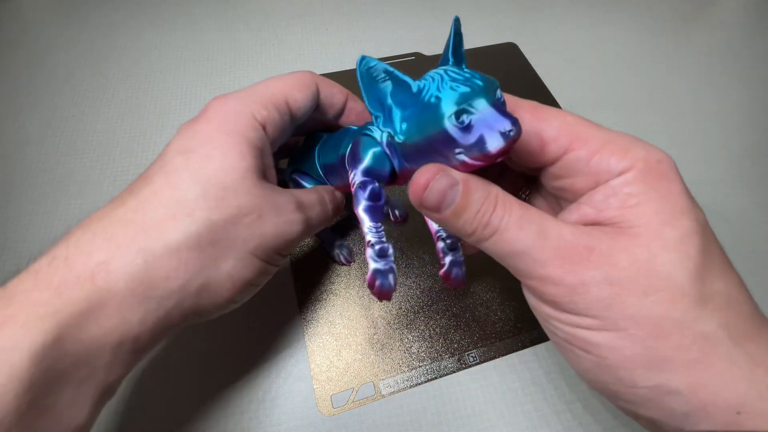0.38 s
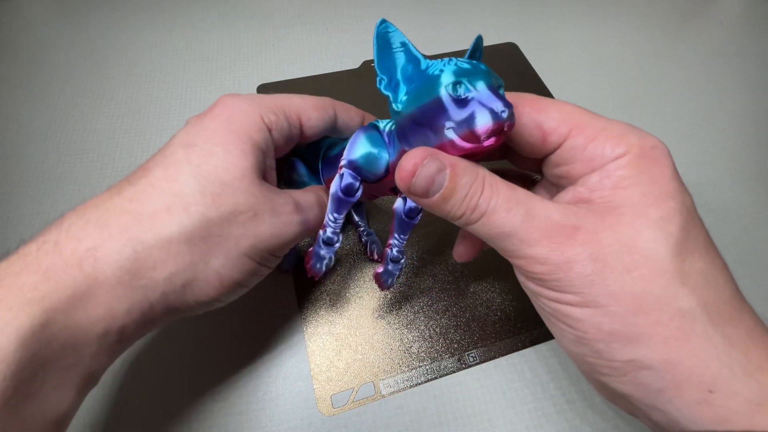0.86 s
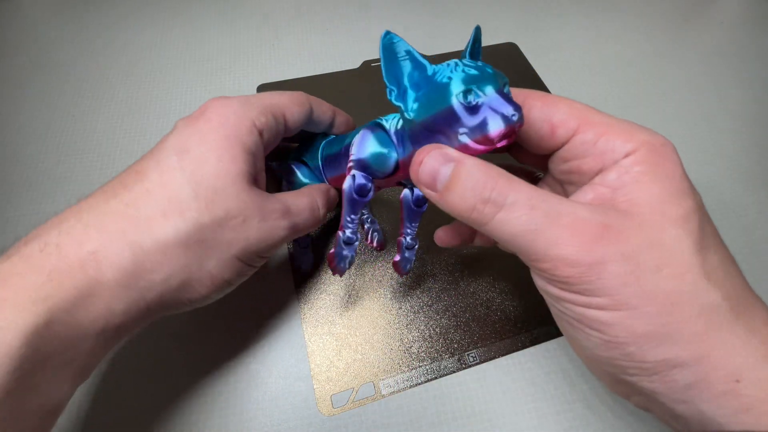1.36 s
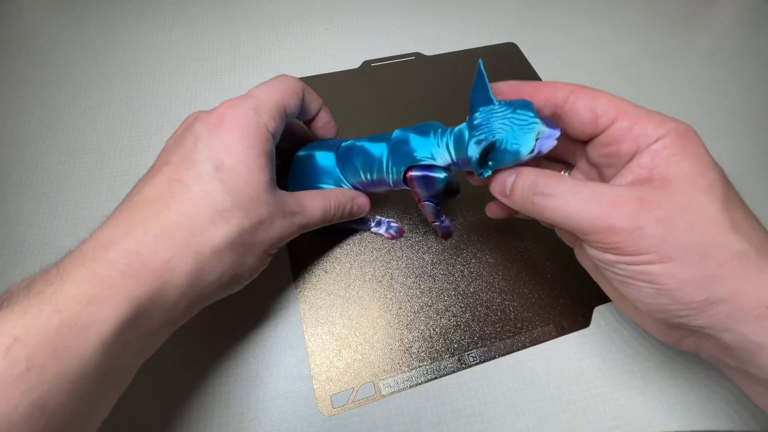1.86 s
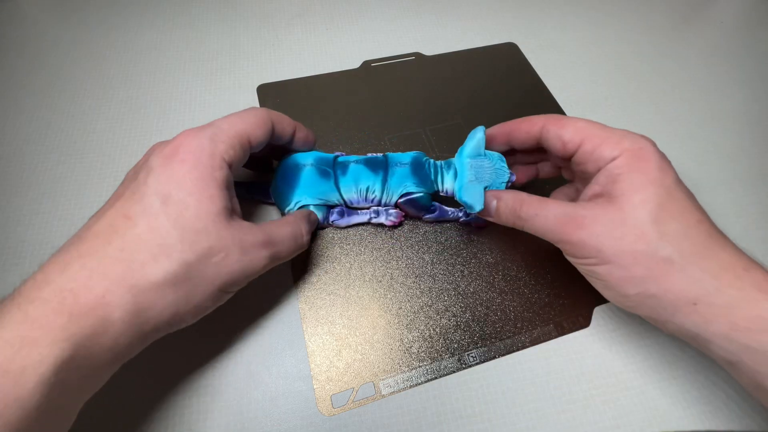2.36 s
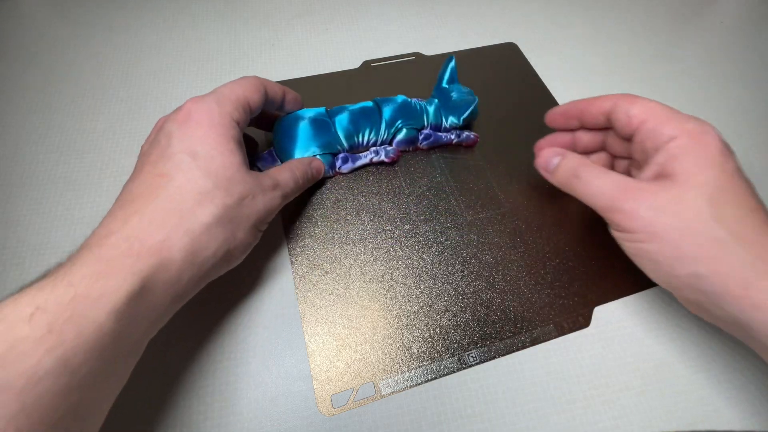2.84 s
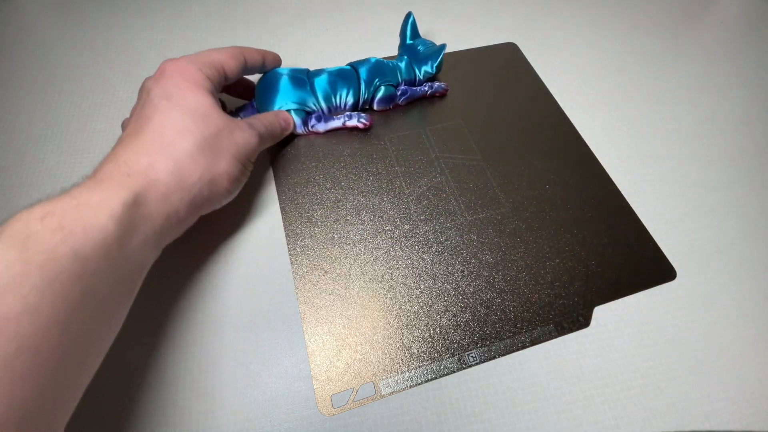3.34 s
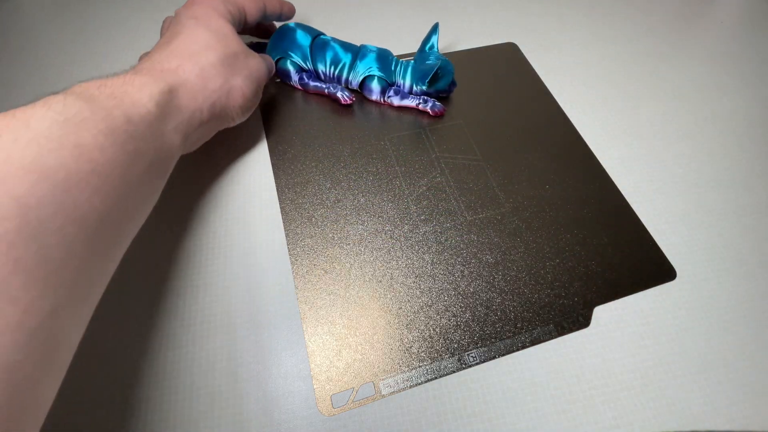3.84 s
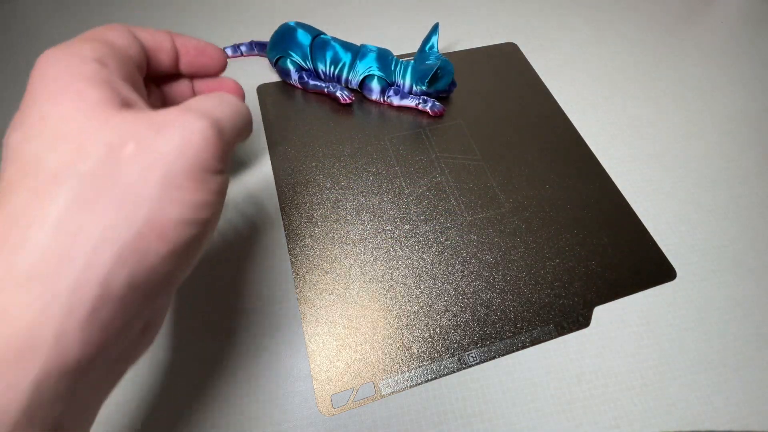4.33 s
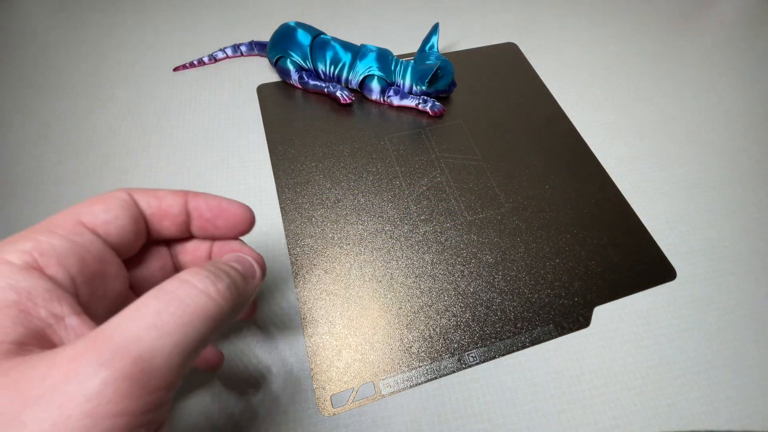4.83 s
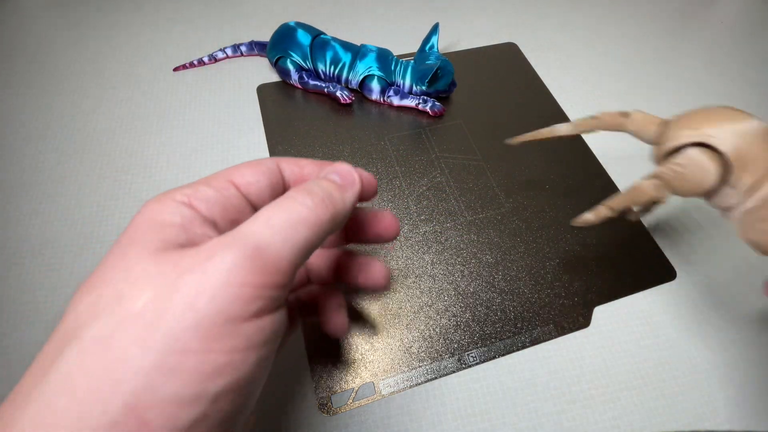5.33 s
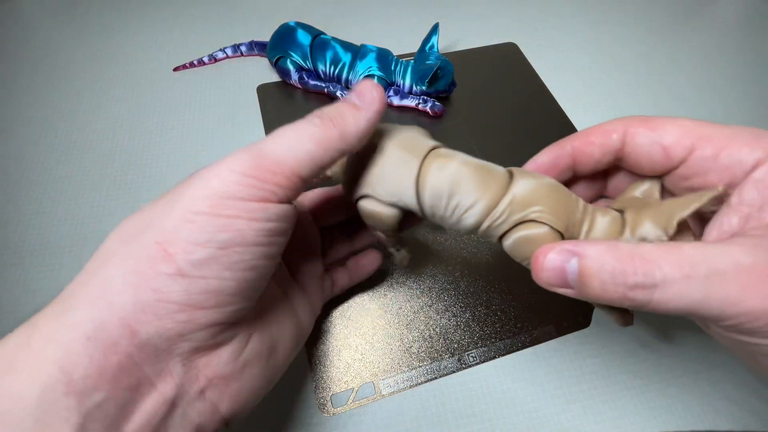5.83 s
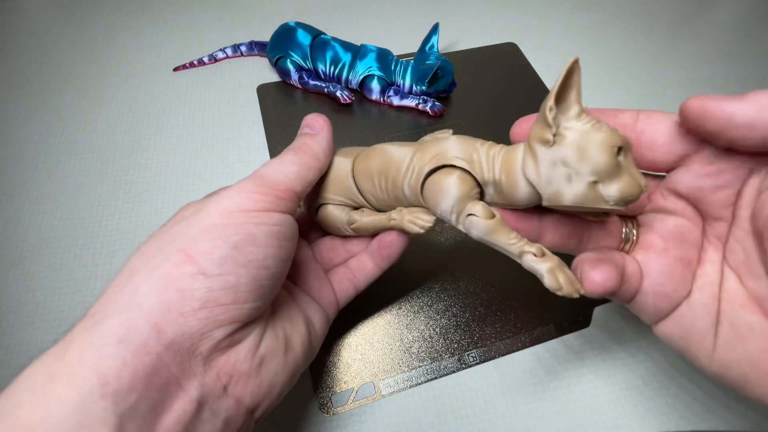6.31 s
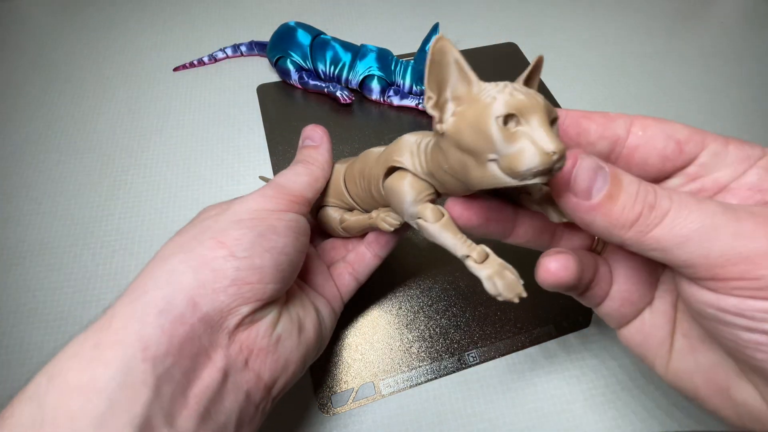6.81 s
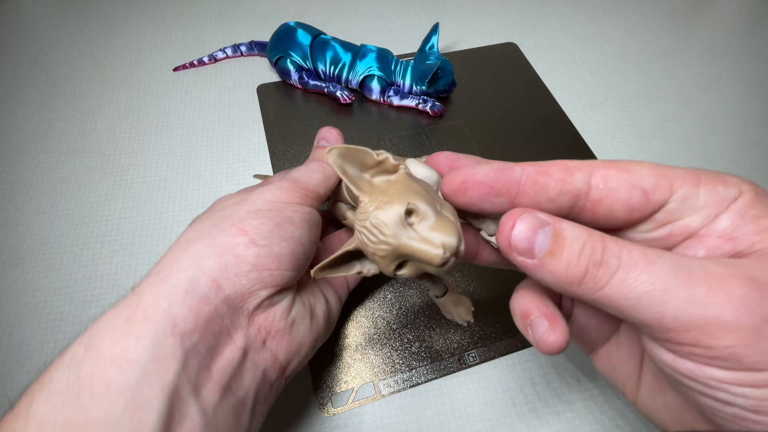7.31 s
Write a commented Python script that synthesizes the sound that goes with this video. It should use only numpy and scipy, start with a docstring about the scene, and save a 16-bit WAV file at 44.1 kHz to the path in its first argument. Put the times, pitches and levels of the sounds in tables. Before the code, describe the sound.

Hands flex a hollow jointed plastic figure close to a phone, with faint rubbing and small clicks. Clacks quicken into one loud knock on a metal sheet over a table, followed by gritty scraping as it slides. After a near-quiet gap, a second figure drags briefly over the table with bright ticks, then clicks and creaks softly in the hands. Small dry room, faint low hum.

```python
"""A table in a small room: hands flex two jointed plastic figures close to a phone, knock one down on a
textured metal sheet and slide it, then drag the second over the table. Knocks are short contact rattles
that excite decaying modes of the hollow plastic and the table top; rubbing is stick-slip noise through
resonances. Two microphone ports add phase, balance and reflections; a faint motor hum and air noise lie below."""
import sys
import numpy as np
from scipy import signal
from scipy.fft import rfft, irfft
from scipy.io import wavfile
from scipy.ndimage import uniform_filter1d

SR = 44100
rng = np.random.default_rng(int(sys.argv[2]) if len(sys.argv) > 2 else 0)


def digitize_waveform(pressure):
    """Quantize a signal to 16-bit integers and store it at the path in sys.argv[1].

    Rows of a 2-D input are taken as channels; values are limited to [-1, 1].
    """
    field = np.atleast_2d(pressure).T
    bounded = np.clip(field, -1, 1)
    quanta = np.round(bounded * 32767).astype(np.int16)
    wavfile.write(sys.argv[1], SR, quanta)


def magnitude_from_level(level_db):
    """Linear magnitude for a level in decibels (20 dB per decade)."""
    exponent = np.asarray(level_db, float) / 20
    return 10 ** exponent


N = 327663
T = np.arange(N) / SR
HZ = np.fft.rfftfreq(N, 1 / SR)
# modes of the table top, lowest first: f/Hz, level/dB, decay time T60/s
TABLE_MODES = [(78, -12, 0.4), (108.2, -3, 0.48), (339.2, -3.5, 0.14), (521.4, -13.5, 0.092)]
# treble resonances of rubbed plastic: f/Hz, width/Hz, level/dB
HISS_PEAKS = [(8900, 1600, -4.5), (10000, 900, -7.5), (11040, 920, -4.5)]


def knocks():
    """Impact excitation: a rattle of contacts rings the struck part, and the body modes near its pitch."""
    # blows: t/s, level/dB, struck part f/Hz, treble level/dB against the body, rattle length/s
    blows = [(0.2488, -30.5, 3200, -33, 0.0053), (.576, -33, 4900, -9, 0.0039),
             (0.61, -47, 1440, -30, .004), (0.617, -29, 1840, -11, 0.0053),
             (0.728, -38.5, 2100, -19, 0.0034), (.737, -39.5, 4270, -4.5, .003),
             (1.257, -43.5, 1830, -22, 0.0063), (1.623, -29, 3200, -37, 0.0035),
             (1.848, -32, 2600, -21.5, 0.0017), (1.8625, -27.5, 2520, -15, 0.0045),
             (1.9738, -23, 3470, -13, 0.0066), (2.069, -26.5, 3200, -9, 0.004),
             (2.1651, -22.5, 3300, -15.5, 0.003), (2.175, -18, 2320, -23, 0.0024),
             (2.183, -21, 2500, -16, 0.0037), (2.1917, -4, 1947, -14, 0.0044),
             (2.3646, -23.5, 3470, -3, 0.0014), (2.3726, -21.5, 3380, -4, 0.0037),
             (2.3847, -17, 3284, -3, 0.0021), (2.5907, -27.5, 3880, -14.5, 0.0078),
             (3.196, -24.5, 5930, -7.5, 0.0052), (3.255, -26.5, 1590, -9.5, .004),
             (3.4862, -27, 3000, -12, 0.003), (4.399, -38.5, 1210, -24.5, 0.0036),
             (4.433, -31.5, 2150, -49, 0.0041), (4.492, -33, 1240, -42, 0.003),
             (4.512, -30, 980, -40, 0.0029), (4.9802, -22.5, 5500, -2.5, 0.0062),
             (5.0076, -29, 6100, 0, 0.003), (5.028, -26, 5700, -1, 0.0092),
             (5.251, -38, 3630, -8.5, 0.0074), (5.2725, -35.5, 3550, -14, 0.006),
             (5.383, -55, 2500, -23, 0.0046), (5.424, -45, 5800, -7, 0.0082),
             (5.543, -25.5, 4980, -3.5, 0.003), (5.6051, -27, 4500, -3, 0.0023),
             (5.6405, -36, 5370, -14.5, 0.0052), (5.7592, -37.5, 3700, -7.5, 0.0048),
             (5.8204, -33, 5370, -8.5, 0.0065), (5.849, -30, 4780, -11.5, 0.0093),
             (5.9307, -33.5, 3470, -5, 0.004), (5.971, -39.5, 2700, -10, 0.012),
             (6.0391, -41.5, 4230, 4.5, 0.0076), (6.049, -41.5, 3540, -0.5, 0.0092),
             (6.1639, -44.5, 1400, -8.5, 0.0033), (6.299, -36, 4700, 0, 0.0058),
             (6.318, -40, 4500, -8, .005), (6.897, -46, 4600, -7.5, 0.0043),
             (6.978, -35.5, 3200, -38, 0.0063), (7.062, -41.5, 2270, -37, 0.0051),
             (7.083, -41, 3000, -31, 0.0092), (7.1349, -35.5, 2130, -10.5, 0.0016),
             (7.1604, -30, 2160, -25, 0.002), (7.363, -48.5, 1247, -49.5, 0.0052)]
    # modes of the hollow plastic: f/Hz, level/dB, decay time T60/s
    plastic_modes = [(785, -18.5, 0.014), (1287, -5, 0.014), (1600, -13, 0.0089), (2010, -5, 0.015),
                     (2520, -4, 0.009), (3380, -4, 0.0037), (4175, 0, 0.0053), (4980, 1, 0.0052),
                     (5600, -3.5, 0.0064), (6550, -6, 0.0073)]
    mode_hz = np.array(plastic_modes)[:, :1]
    out = np.zeros(N + SR)
    t = np.arange(SR // 4) / SR
    rattle_t = t[:2048]
    bass_cut = signal.butter(2, 650, "high", fs=SR, output="sos")  # knocks carry little bass
    middle = signal.butter(3, (1000, 6500), "band", fs=SR, output="sos")
    treble = signal.butter(3, (7500, 15800), "band", fs=SR, output="sos")
    for start_s, level_db, part_hz, treble_db, rattle_s in blows:
        chance = rng.standard_normal(32)
        swell_s = -0.25 * level_db * rattle_s  # lighter blows swell more slowly
        swell = (1.5 - np.exp(-rattle_t / swell_s)) ** 2
        fade = swell * np.exp(-(rattle_t / rattle_s) ** 2)
        contacts = (rng.random(2048) < 0.15) * rng.standard_normal(2048) * fade

        # modes weaken per octave away from the struck part; hard blows wake more of them
        focus_db_per_octave = -7 + 0.36 * level_db
        near = magnitude_from_level(focus_db_per_octave * np.abs(np.log2(mode_hz / part_hz)))
        shell = np.sum(near * ring(plastic_modes, t, chance), 0)
        part_db = -10.5 - 0.33 * level_db  # the part's own ring stands out more in light knocks
        part = ring([(part_hz, part_db, 0.007)], t, np.zeros(1))[0]
        body = signal.fftconvolve(shell + part, contacts)[:len(t)]
        body = signal.sosfilt(bass_cut, body) / np.abs(body).max()

        # the bare crack of the contacts: middle set by its peak, treble by its rms
        span = int(2 * SR * rattle_s)
        crack = signal.sosfilt(middle, contacts)
        body[:2048] += magnitude_from_level(-13.5) * crack / np.max(crack[:span])
        crack = signal.sosfilt(treble, contacts)
        body[:2048] += magnitude_from_level(treble_db) * crack / np.std(crack[:span])

        # the table swings up over a few milliseconds; harder blows pass on a larger share
        table = (1 - np.exp(-t / 0.011)) * np.sum(ring(TABLE_MODES, t, chance), 0)
        body += magnitude_from_level(-17 + level_db) * table
        i = int(start_s * SR)
        out[i:i + len(t)] += magnitude_from_level(level_db) * body
    return out[:N]


def ring(modes, t, chance):
    """Modal decay: damped sines, the most damped shifting most in pitch and weight on every blow."""
    hz, db, t60 = np.transpose(modes)[:, :, None]
    hz = hz + 0.6 / t60 * chance[:len(hz), None]
    db = db + 0.015 / t60 * chance[::-1][:len(hz), None]
    return magnitude_from_level(db) * np.exp(-np.log(1000) * t / t60) * np.sin(2 * np.pi * hz * t)


def pings():
    """Lightly damped resonance: a thin part rings on, fluttering while it still touches its neighbour."""
    # thin parts left ringing by a knock: t/s, level/dB, f/Hz, decay time T60/s
    ringing_parts = [(5.012, -30, 5790, 0.19), (5.034, -44, 5760, 0.46), (5.276, -53, 3550, 0.21)]
    out = np.zeros(N)
    wobble = 1.3 * walk(200)  # radians
    for start_s, db, hz, t60 in ringing_parts:
        t = np.maximum(T - start_s, 0)
        onset = 1 - np.exp(-t / 0.0019)
        out += magnitude_from_level(db - 60 * t / t60) * onset * np.sin(2 * np.pi * hz * t + wobble)
    return out * magnitude_from_level(3 * walk(160))


def sliding():
    """Sliding friction: plastic scrapes over the grainy sheet or the table and makes the top rumble."""
    # a figure pushed over the sheet, then one dragged over the table: t/s, scrape level/dB, table level/dB
    slides = [
        [(2.225, -37, -53), (2.255, -40.5, -47), (2.345, -47, -54.5), (2.395, -35.5, -44.5),
         (2.494, -48.5, -44), (2.689, -40.5, -40), (2.998, -46, -45), (3.497, -46, -46), (3.647, -49.5, -52.5),
         (3.861, -49, -50.5), (4.026, -77, -76.5)],
        [(4.33, -76.5, -72.5), (4.43, -56, -51), (4.47, -63, -46), (4.51, -48.5, -50.5), (4.744, -38, -46.5),
         (4.869, -46.5, -85), (4.939, -69, -68), (5.034, -39, -48), (5.153, -77, -62.5), (5.198, -68, -76)],
    ]
    # resonances on the sheet: f/Hz, width/Hz, level/dB
    sheet_peaks = [(900, 600, 5.5), (1620, 97, -4.5), (2018, 260, 0.5), (4120, 480, -9),
                   (5570, 1400, -11.5)]
    # resonances on the bare table: f/Hz, width/Hz, level/dB
    drag_peaks = [(840, 200, -7.5), (1235, 180, 7), (1770, 160, -2), (2250, 320, -5), (2700, 150, -11.5),
                  (4730, 7400, -13)]
    # resonance of the thin paw: f/Hz, width/Hz, level/dB
    paw_peaks = [(3380, 350, 3)]
    # the thin paw scraping along: t/s, length/s, first level/dB, last level/dB
    paw_strokes = [(2.37, 0.057, -40.5, -42), (2.43, 0.24, -53, -39), (2.7, 0.37, -42, -56),
                   (3.03, 0.31, -52, -55.5), (4.99, 0.12, -51, -59)]
    out = strokes(paw_strokes) * resonate(slips(9000, 2.4, 2.0, 140), paw_peaks)
    # broad band dB, hiss dB and stutter dB of each surface
    surfaces = (sheet_peaks, -7, -16, 1.6), (drag_peaks, -17, -24, 1.8)
    for levels, (peaks, broad_db, hiss_db, stutter_db) in zip(slides, surfaces):
        scrape_level, table_level = curves(levels)
        force = slips(9000, 1.7, stutter_db, 140)
        body = resonate(force, peaks, broad_db=broad_db, broad_hz=1392, patchy_db=2.5)
        hiss = magnitude_from_level(hiss_db) * resonate(force, HISS_PEAKS)
        out = out + scrape_level * (body + hiss) + table_level * table_rub(TABLE_MODES[2:])
    return out


def flexing():
    """Stick-slip: skin and joints creep over the layer lines; tight joints creak at their own pitch."""
    # resonances of a held figure: f/Hz, width/Hz, level/dB
    grip_peaks = [(874, 220, -6), (1268, 200, -5), (2180, 950, 3), (3200, 270, -5), (5000, 600, -8.5)]
    # fingers and joints rubbing, one row a movement: t/s, length/s, first level/dB, last level/dB
    rub_strokes = [(0, 0.46, -48.5, -51), (.5, 0.086, -45.5, -46), (.63, 0.062, -67, -58),
                   (.735, 0.061, -49, -51.5), (.9, 0.13, -56.5, -71), (1.225, 0.08, -59, -62.5),
                   (1.335, 0.16, -49.5, -43), (1.52, 0.3, -46, -48.5), (1.85, 0.081, -43, -44),
                   (1.965, 0.13, -42, -44.5), (2.1, 0.038, -59, -47.5), (2.173, 0.011, -29.5, -36),
                   (4.9, 0.031, -45, -52), (4.965, 0.105, -52.5, -54), (5.08, 0.43, -60.5, -69),
                   (5.555, 0.069, -63.5, -52), (5.66, 0.18, -60, -60), (5.83, 0.037, -50, -54.5),
                   (5.95, 0.1, -50.5, -53.5), (6.09, 0.11, -60.5, -66), (6.26, 0.038, -62, -48.5),
                   (6.35, 0.1, -67, -69), (6.61, 0.7, -63.5, -63.5), (6.97, 0.031, -51, -62),
                   (7.08, 0.091, -54.5, -51.5)]
    # a tight joint creaking: t/s, length/s, first level/dB, last level/dB, f/Hz
    squeaks = [(5.93, 0.099, -59, -60, 900), (6.759, 0.011, -57, -58, 2040),
               (6.835, 0.016, -64, -48.5, 1940), (7.168, 0.024, -61, -54, 1950)]
    force = slips(9000, 2.1, 1.3, 90)
    grip = resonate(force, grip_peaks, broad_db=-13.0, broad_hz=3000, patchy_db=2.5, patchy_rate=94)
    grip = grip + magnitude_from_level(-9.5) * resonate(force, HISS_PEAKS)
    out = strokes(rub_strokes) * grip
    for *row, hz in squeaks:
        creak = resonate(force, [(hz, 0.061 * hz, 0)], patchy_db=3.5, patchy_rate=150)
        out = out + strokes([row], rise=1501.5, fall=1501.5) * creak
    return out


def arms():
    """Forced vibration: arms and figures shifting their weight stir the table's lowest modes."""
    # shifting weight: t/s, level/dB
    arm_levels = [(0.0, -59.5), (0.659, -53.5), (1.172, -66.5), (1.497, -51.5), (1.6, -57), (2.135, -54.5),
                  (2.19, -42.5), (2.32, -49), (2.594, -54), (2.674, -45.5), (3.088, -58.5), (3.702, -52.5),
                  (4.136, -70), (4.385, -69.5), (4.57, -53.5), (5.073, -58), (5.343, -67), (7.43, -65.5)]
    return curves(arm_levels)[0] * table_rub(TABLE_MODES[:2])


def table_rub(modes):
    """Forced resonance: table modes driven by steady rubbing, twice as wide as their free decay implies."""
    peaks = [(hz, 2 * np.log(1000) / np.pi / t60, db) for hz, db, t60 in modes]
    return resonate(slips(6000, 0.39, 0.39, 30), peaks)


def slips(rate, scatter_db, stutter_db, stutter_rate):
    """Stick-slip: dense tiny clicks (rate per s) of uneven size whose strength stutters."""
    sizes = magnitude_from_level(scatter_db * rng.exponential(size=N)) * rng.standard_normal(N)
    clicks = (rng.random(N) < rate / SR) * sizes
    return clicks * magnitude_from_level(stutter_db * walk(stutter_rate))


def resonate(x, peaks, broad_db=-60, broad_hz=2500, patchy_db=0, patchy_rate=60):
    """Parallel resonances over one very wide band, each caught unevenly as the contact wanders; rms 1."""
    out = np.zeros(N)
    for hz, width_hz, db in list(peaks) + [(broad_hz, 2 * broad_hz, broad_db)]:
        caught = x * magnitude_from_level(patchy_db * walk(patchy_rate))
        out += magnitude_from_level(db) * signal.lfilter(*signal.iirpeak(hz, hz / width_hz, SR), caught)
    return unit(out)


def strokes(rows, rise=1300, fall=327):
    """Exponential onset and decay (dB per s): each movement swells, glides between its levels and dies away."""
    power = np.zeros(N)
    for start_s, length_s, first_db, last_db in rows:
        end_s = start_s + length_s
        db = np.interp(T, (start_s, end_s), (first_db, last_db))
        db = db - rise * np.maximum(start_s - T, 0) - fall * np.maximum(T - end_s, 0)
        power += magnitude_from_level(2 * db)
    return np.sqrt(power)


def curves(table):
    """Level envelopes: a table's columns interpolated in dB at every sample, silent outside its span."""
    s, *columns = np.transpose(table)
    return [magnitude_from_level(np.interp(T, s, c, left=-150, right=-150)) for c in columns]


def walk(rate):
    """Slow random modulation: random levels held 1 / rate s and slewed; rms near 1."""
    k = int(SR / rate)
    held = np.repeat(rng.standard_normal(N // k + 1), k)
    return unit(uniform_filter1d(held, k)[:N])


def unit(x):
    """Normalisation to an rms of 1."""
    return x / np.sqrt(np.mean(x ** 2))


def ports(x):
    """Two-point reception: direct sound with the ports' phase and balance, plus a share of reflections."""
    # ports: f/Hz, response level/dB, left's phase lead/rad, left minus right level/dB, reflected power share/0-1
    port_curves = [(100, -4, 0.5, -2, 0), (360, -0.5, 0.5, -8, 0), (564, 3.5, -2, -2, 0.3),
                   (714, 6, -4, -3, 0.45), (1230, 0.5, -5, 0.5, 0.4), (1710, -1.5, -6, -0.5, 0.25),
                   (2500, 2.5, -5, -1.5, 0.13), (4600, 1.5, -5, -1, 0.3), (5610, 1.5, -5.5, 0, 0.2),
                   (7030, 0, -3.5, -1.5, 0.1), (7560, -2.5, -3, 2, 0), (9300, -10.5, -1.6, -3, 0.2),
                   (12000, -12.5, 0.84, 1, 0.2), (14600, -22, 4, 0.5, 0)]
    hz, *columns = np.transpose(port_curves)
    response_db, lead, balance_db, wet = (np.interp(np.log(HZ + 1), np.log(hz), c) for c in columns)
    side = np.array([[0.5], [-0.5]])  # left, right
    gain = magnitude_from_level(response_db + side * balance_db) * np.exp(1j * side * lead)
    direct = np.sqrt(1 - wet) * rfft(x)
    reflected = np.sqrt(wet) * rfft(reflections(x))
    return irfft(gain * (direct + reflected), N)


def reflections(x, hop=8192):
    """Diffuse decay: quick echoes, unlike left and right, that change as the hands move about."""
    room_t60_s = 0.16
    out = np.zeros((2, N + 5 * hop))
    x = np.pad(x, (hop, 2 * hop))
    decay = np.exp(-np.log(1000) * T[:hop] / room_t60_s)
    window = np.sin(np.pi * np.arange(2 * hop) / (2 * hop))  # overlapping pieces keep the power even
    for i in range(0, N + hop, hop):
        tail = rng.standard_normal((2, hop)) * decay
        tail /= np.sqrt(np.sum(tail ** 2, 1, keepdims=True))
        piece = x[i:i + 2 * hop] * window
        out[:, i:i + 3 * hop - 1] += signal.fftconvolve(tail, piece[None])
    return out[:, hop:hop + N]


def room_tone():
    """Tonal and diffuse noise: wavering motor lines over dull air noise, less alike at the ports in treble."""
    # motor lines: f/Hz, mean level/dB
    hum_lines = [(48.4, -74.5), (98.6, -78), (247.6, -81.5), (296.1, -78), (344.5, -66)]
    # air noise spectrum: f/Hz, relative level/dB per Hz
    air_spectrum = [(30, -18), (107, -18), (197, -27), (344, -12), (432, -19), (3560, -42.5), (6070, -47.5),
                    (13000, -57.5), (14000, -74)]
    hum = np.zeros(N)
    for hz, db in hum_lines:
        level = np.sqrt(2) * magnitude_from_level(db + 2.8 * walk(9))
        hum += level * np.sin(2 * np.pi * (hz * T + rng.random()))
    air_hz, air_db = np.transpose(air_spectrum)
    shape = magnitude_from_level(np.interp(np.log(HZ + 1), np.log(air_hz), air_db))
    alike = np.clip(220 / (HZ + 1), 0, 1)  # long waves reach both ports together
    both, left, right = rfft(rng.standard_normal((3, N)))
    air = irfft(shape * (alike * both + np.sqrt(1 - alike ** 2) * np.array([left, right])), N)
    return hum * magnitude_from_level([[-2.5], [2.5]]) + magnitude_from_level(-67) * unit(air)  # hum is stronger on the right


def scene():
    """Superposition: the sources reach the ports together, over the room tone."""
    return ports(knocks() + pings() + sliding() + flexing() + arms()) + room_tone()


def top_cut(x):
    """Nothing passes above the cut-off."""
    return signal.sosfilt(signal.butter(12, 16150, fs=SR, output="sos"), x)


def record(dry):
    """High-pass filtering: the phone cuts the deepest bass."""
    mix = signal.sosfilt(signal.butter(4, 45, "high", fs=SR, output="sos"), dry)
    return top_cut(mix)


dry = scene()
out = record(dry)
digitize_waveform(out)
```